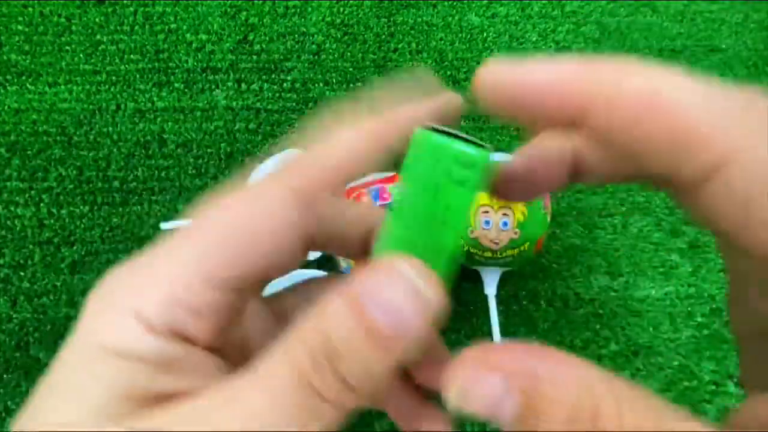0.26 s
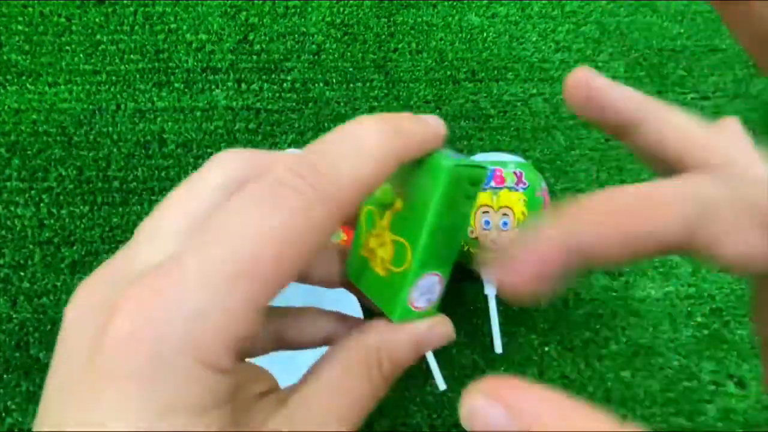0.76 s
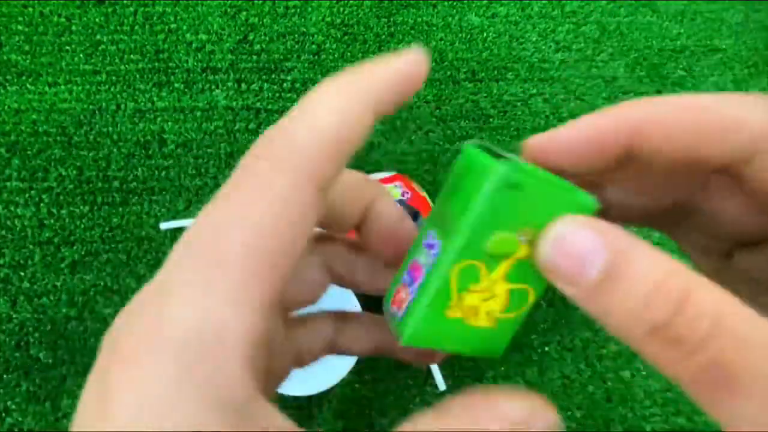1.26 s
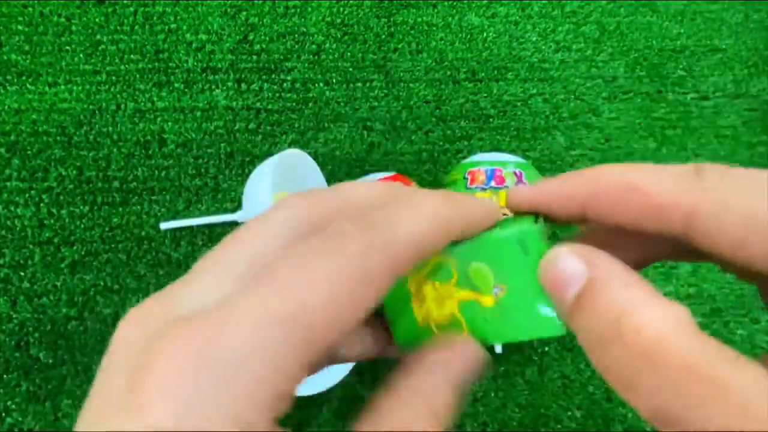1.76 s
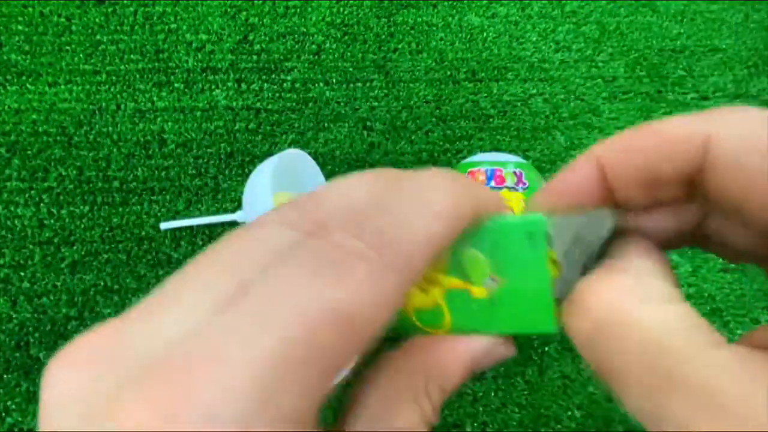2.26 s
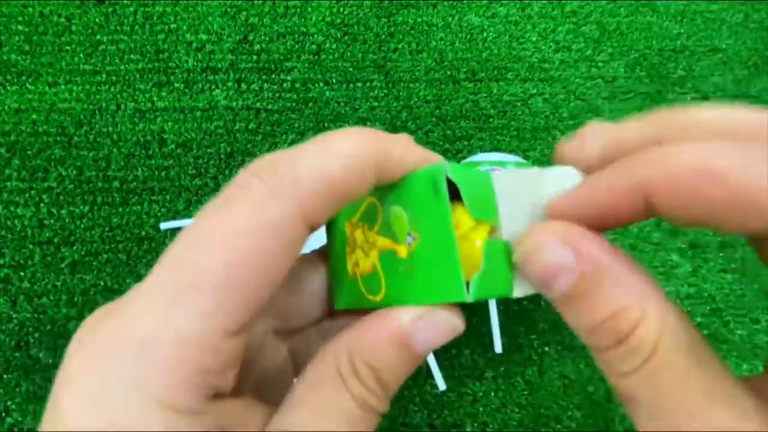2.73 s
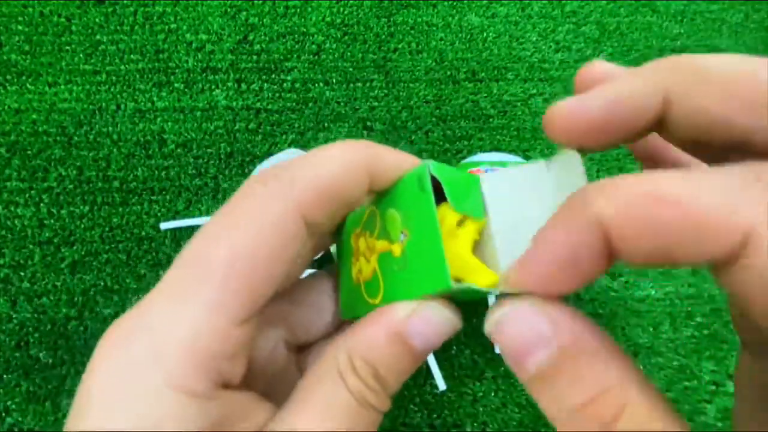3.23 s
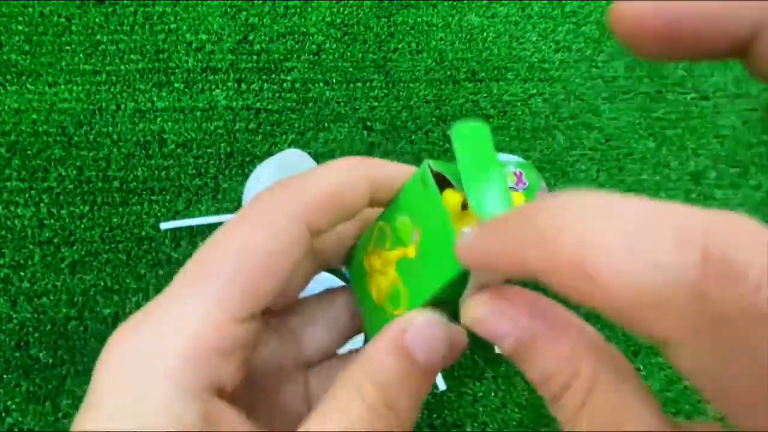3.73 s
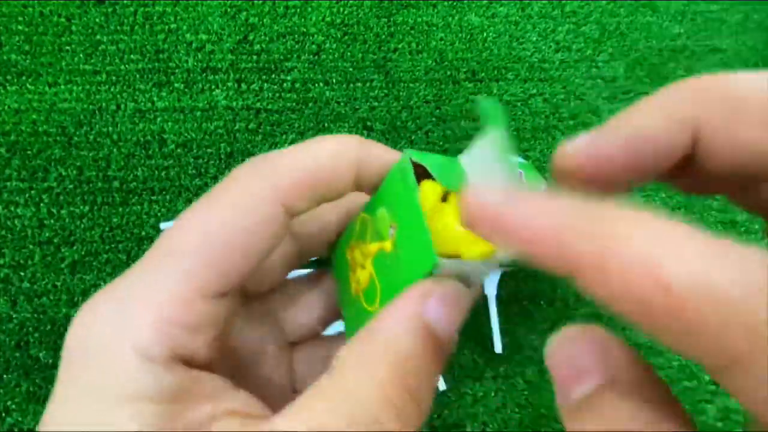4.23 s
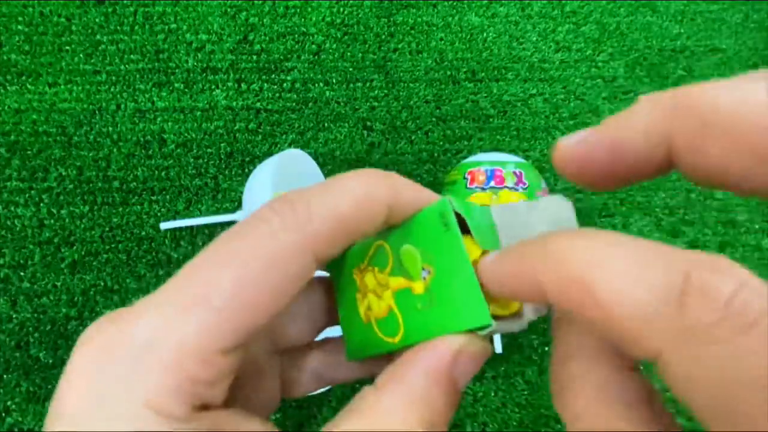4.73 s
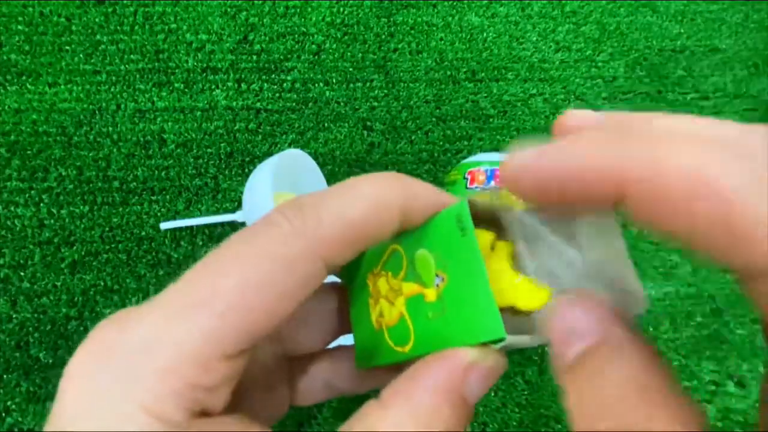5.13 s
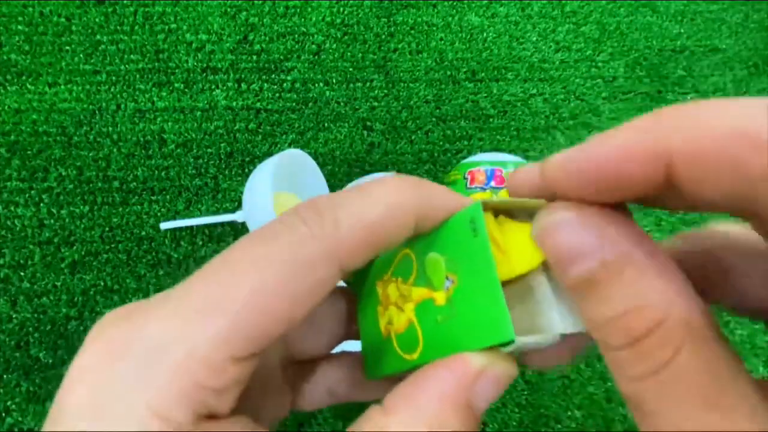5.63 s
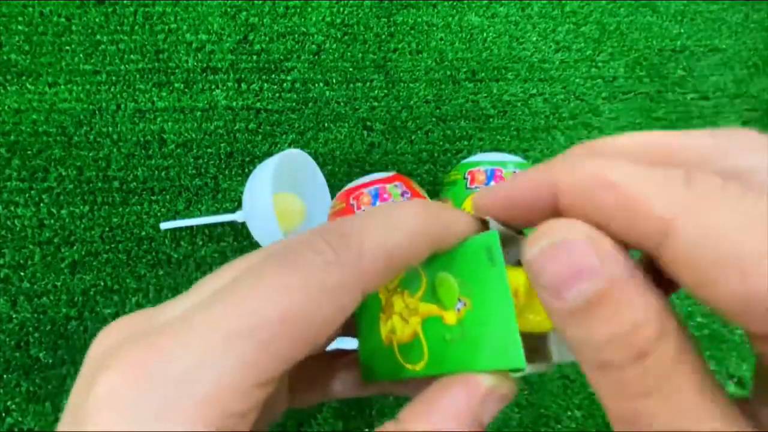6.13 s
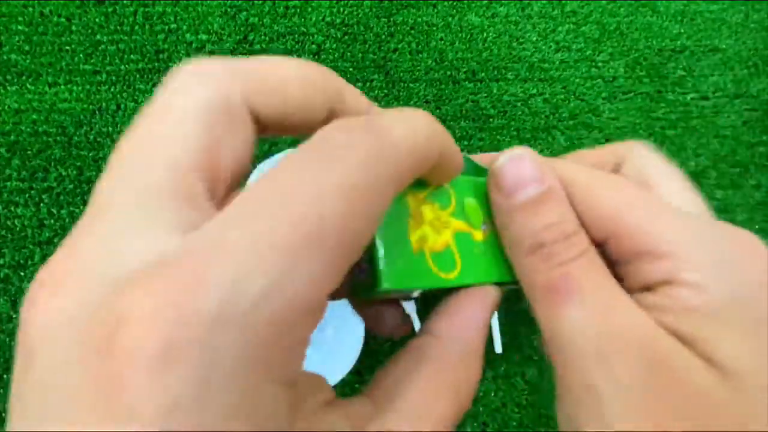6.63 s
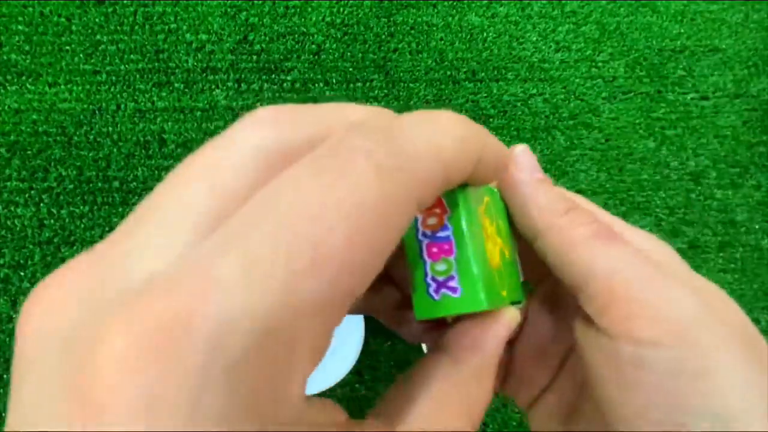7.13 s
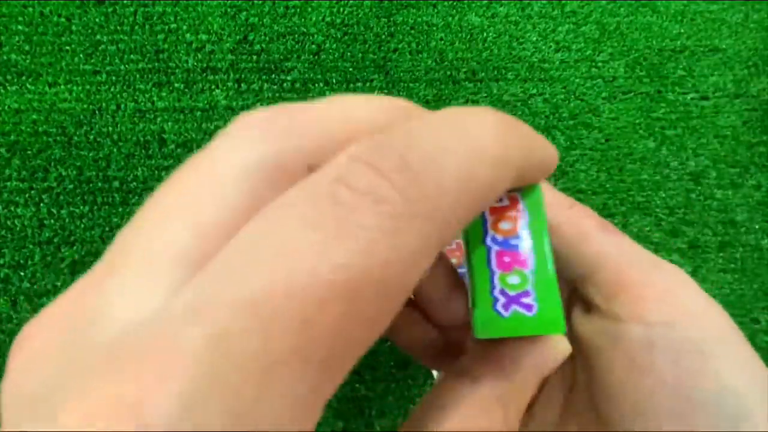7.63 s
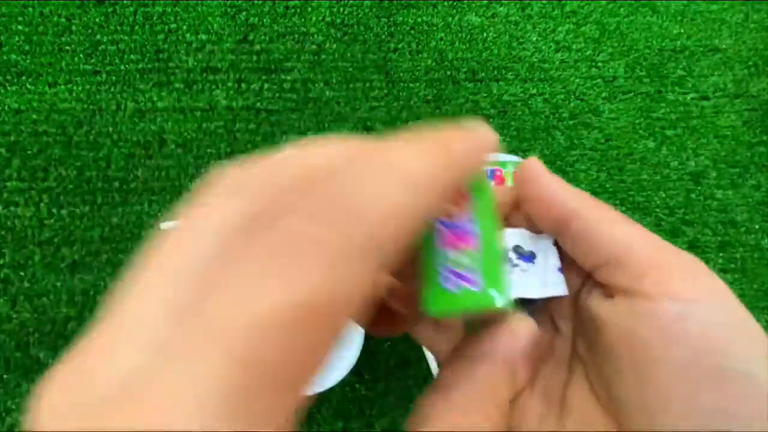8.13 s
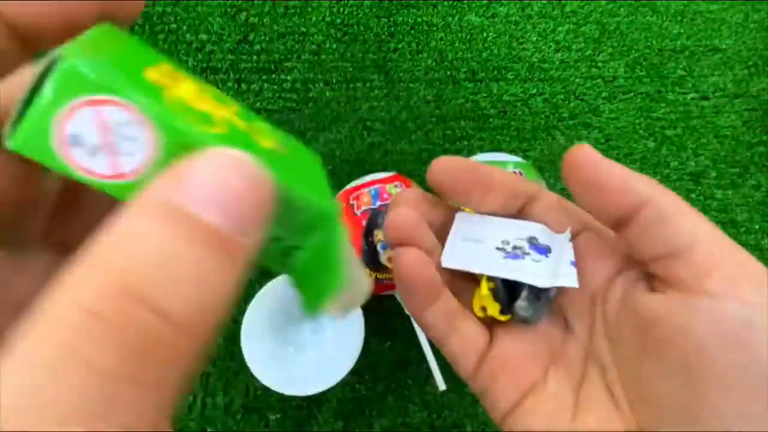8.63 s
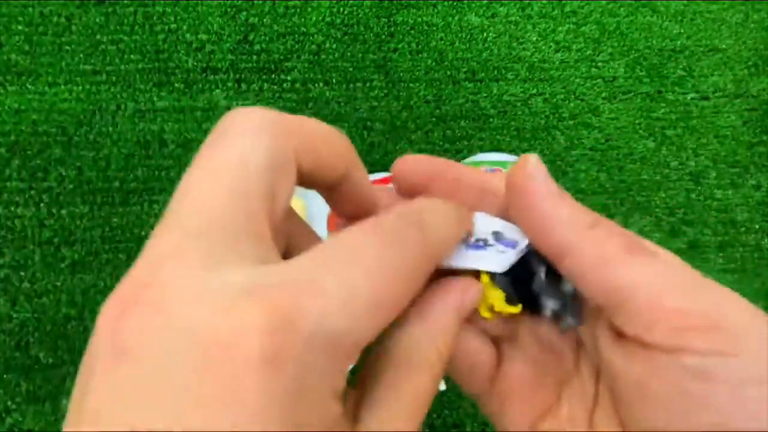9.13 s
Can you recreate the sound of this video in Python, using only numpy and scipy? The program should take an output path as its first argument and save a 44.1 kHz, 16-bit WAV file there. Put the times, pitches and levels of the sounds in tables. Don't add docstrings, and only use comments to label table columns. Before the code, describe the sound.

Very close to a stereo microphone, fingernails knock a small hollow card box in a few loud, separate taps. A crisp snap opens a flap, followed by irregular papery scrapes and faint creaks as the card is bent. Later, small plastic parts slide and rattle lightly out. Soft low hand bumps and a faint hush sit underneath in a small, soft-sounding space.

```python
import sys
import numpy as np
from scipy import signal
from scipy.fft import rfft, irfft, next_fast_len
from scipy.io import wavfile
from scipy.ndimage import map_coordinates

SR = 44100
rng = np.random.default_rng(int(sys.argv[2]) if len(sys.argv) > 2 else 0)


def magnitude_from_level(level_db):
    exponent = np.asarray(level_db, float) / 20
    return 10 ** exponent


def put_to_file(sound):
    columns = np.atleast_2d(sound).T
    safe = np.clip(columns, -1, 1)
    whole_steps = np.round(safe * 32767)
    wavfile.write(sys.argv[1], SR, whole_steps.astype(np.int16))


N = 413216

# (centre [Hz], width [Hz], level [dB])
BODY_MODES = [(460, 350, -13), (814, 260, -7.5), (1290, 288, 0)]
# (centre [Hz], width [Hz], level [dB])
WALL_MODES = [(1896, 500, 0), (2400, 570, 2), (3250, 1000, -5), (4300, 1300, -6.5), (5042, 980, -4),
              (6280, 930, -7.5)]
# (centre [Hz], width [Hz], level [dB])
EDGE_MODES = [(7970, 1200, -1), (9670, 650, 1.5), (10260, 1600, -3), (13300, 1800, -6), (15600, 2100, -12)]


def unit(x):
    return x / np.sqrt(np.mean(x ** 2, axis=-1, keepdims=True) + 1e-30)


def along(points, hz):
    point_hz, value = np.transpose(points)
    return np.interp(np.log(hz + 1), np.log(point_hz + 1), value)


def curves(rows):
    time_s, *columns = np.transpose(rows)
    return [np.interp(np.arange(N) / SR, time_s, column) for column in columns]


def wobble(rate_hz):
    knots = rng.standard_normal(int(N * rate_hz / SR) + 4)
    return map_coordinates(knots, [np.arange(N) * rate_hz / SR])


def filtered(x, response):
    size = next_fast_len(x.shape[-1] + 2048)
    spectrum = rfft(x, size) * response(np.fft.rfftfreq(size, 1 / SR))
    return irfft(spectrum, size)[..., :x.shape[-1]]


def resonance(hz, centre_hz, width_hz):
    damping = 1j * hz * width_hz
    return damping / (centre_hz * centre_hz - hz * hz + damping)


def ringing(modes, scatter_db=0, count=1):
    luck_db = scatter_db * rng.standard_normal((count, len(modes), 1))

    def response(hz):
        return sum((-1) ** k * magnitude_from_level(level_db + luck_db[:, k]) * resonance(hz, centre_hz, width_hz)
                   for k, (centre_hz, width_hz, level_db) in enumerate(modes))
    return response


def air():
    # (time [s], rumble level [dB])
    hand_bumps = [(0.0, -103), (0.1, -53), (0.18, -74), (0.7, -78), (0.78, -52.5), (0.91, -82), (1.02, -62),
                  (1.09, -71.5), (2.09, -77.5), (2.24, -75.5), (2.53, -84.5), (3.89, -72.5), (4.02, -90),
                  (4.41, -69), (4.46, -81.5), (7.93, -80), (8.43, -63.5), (8.51, -76), (8.82, -74.5),
                  (8.98, -58), (9.06, -78), (9.37, -69.5)]
    # (frequency [Hz], density [dB per Hz])
    rumble_spectrum = [(20, -16.5), (50, -5), (90, -2.5), (200, -14), (400, -23), (900, -36), (2000, -120)]
    # (frequency [Hz], density [dB per Hz])
    hush_spectrum = [(60, -120), (150, 1), (500, 5), (1500, -5), (4000, -3.5), (10000, -15.5), (16000, -17)]
    noise = rng.standard_normal((2, N))
    low = unit(filtered(noise, lambda hz: magnitude_from_level(along(rumble_spectrum, hz))))
    bump_gain = magnitude_from_level(curves(hand_bumps)[0] + 2.5 * wobble(25))
    shared = low[0] * magnitude_from_level([[-.8], [.8]])
    opposed = .3 * low[1] * [[1], [-1]]
    noise = rng.standard_normal((2, N))
    hush = unit(filtered(noise, lambda hz: magnitude_from_level(along(hush_spectrum, hz))))
    return bump_gain * (shared + opposed) + magnitude_from_level(-82.5) * hush


def room(x):
    # (frequency [Hz], t60 [s])
    decay_times = [(200, 0.48), (1000, 0.21), (4000, 0.21), (10000, 0.17), (16000, 0.04)]
    hz, t, z = signal.stft(rng.standard_normal((2, SR // 2)), SR, nperseg=256)
    decay = magnitude_from_level(-60 * t / along(decay_times, hz)[:, None])
    tail = signal.istft(z * decay, SR, nperseg=256)[1]
    tail = np.pad(tail / np.linalg.norm(tail[0]), ((0, 0), (round(0.005 * SR), 0)))
    tail = filtered(tail, lambda hz: 1 / (1 + 1j * hz / 7000))
    return [signal.fftconvolve(x, one)[:N] for one in tail]


def slide():
    # (time [s], scrape level [dB], hollow body [dB], crisp edge [dB])
    scrapes = [(0.0, -55.5, -6, -20), (0.08, -55.5, -4.5, -12), (0.125, -66, 4, -12),
               (0.16, -76.5, 15, -12), (0.2, -85.5, 11.5, -8.5), (0.284, -71.5, 7.5, 3.5),
               (0.354, -55, -1, -6.5), (0.429, -69, -2, -1.5), (0.753, -75, -2.5, -17.5),
               (0.783, -49, -4, -13), (0.973, -75.5, 0.5, -10.5), (0.998, -50.5, -2.5, -14),
               (1.212, -74, -1.5, -0.5), (1.237, -48, -4.5, -4.5), (1.342, -72.5, -0.5, -7),
               (1.467, -79, -6.5, -11.5), (1.492, -54.5, 10, -9.5), (1.541, -76.5, 1, -8.5),
               (1.761, -59, -0.5, -8), (1.906, -57.5, -5, -10.5), (1.98, -45, -5, -8), (2.04, -64, -4, -10),
               (2.185, -86, 2, 3.5), (2.21, -34.5, 4.5, 6.5), (2.27, -63.5, -4.5, -4.5),
               (2.479, -62.5, 1.5, -7.5), (2.519, -76.5, -1.5, -10), (2.574, -49.5, -3, -4.5),
               (2.624, -48.5, -3, -1.5), (2.679, -77, 0, -12), (2.769, -55.5, -2.5, -5.5),
               (2.794, -67, -3, -4), (2.829, -54.5, 2, 3.5), (2.873, -76.5, -6, -1),
               (2.928, -57.5, -3.5, -2.5), (3.073, -74.5, -6, -3.5), (3.188, -56, -7.5, -6.5),
               (3.547, -69, -7, -4.5), (3.577, -41.5, -1, -5), (3.662, -66, -17, -3.5),
               (3.702, -54.5, -9.5, -7.5), (3.766, -64, -14.5, -10), (3.801, -43.5, -8.5, -7),
               (3.846, -39, -6.5, -7.5), (3.941, -72, -7, -6.5), (4.176, -76.5, -10.5, -10.5),
               (4.245, -53, -5, -5.5), (4.295, -67, -8, -8.5), (4.33, -43, -4.5, -5.5), (4.375, -73, 0, -6),
               (4.51, -55.5, -10.5, -4), (4.575, -67.5, -8, -4), (4.629, -64.5, -1, -10.5),
               (4.919, -71, -4, -7.5), (4.949, -42.5, -13, -5), (5.004, -61, -9.5, -9),
               (5.223, -47, -7.5, -6.5), (5.318, -59, -5.5, -12), (5.378, -44.5, -6.5, -11),
               (5.507, -63, -1.5, -13.5), (5.587, -39, -4, -15), (5.667, -71.5, 1.5, -6),
               (5.832, -64.5, -0.5, -3.5), (5.897, -74, -14, -5.5), (5.941, -54.5, -1.5, -9),
               (6.046, -70, 4, -17), (6.071, -52.5, 6, -14.5), (6.096, -47, 4, -14.5),
               (6.136, -46.5, 2.5, -8.5), (6.186, -70.5, -13, -4), (6.316, -73, -6, -3.5),
               (6.351, -56, -1.5, -2.5), (6.39, -55, -5, -3), (6.42, -58.5, -1, -5.5),
               (6.929, -66, -3, -8.5), (6.964, -48, -6, -17), (7.024, -40, -2.5, -14),
               (7.099, -61, -4, -20.5), (7.134, -45.5, -2.5, -12.5), (7.249, -59.5, -0.5, -11),
               (7.323, -45, -1.5, -11.5), (7.363, -49.5, -3.5, -11.5), (7.393, -64, -4.5, -14.5),
               (7.428, -46, -3.5, -12), (7.558, -38.5, -19, -3), (7.618, -65.5, -11.5, -5),
               (7.643, -48, -10, -7), (7.732, -50.5, -10, -10), (8.122, -80.5, -10, 1),
               (8.161, -49.5, -7.5, -7), (8.231, -81, -3, -8), (8.326, -70.5, -8.5, -3),
               (8.351, -40, -7, -4), (8.376, -38, -7.5, -5), (8.496, -47.5, -16.5, -5),
               (8.521, -76, -30, -3), (8.81, -60.5, -13, -10.5), (8.88, -61, -9, -6),
               (8.955, -46.5, -12, -11), (9.024, -58, -21, -7.5), (9.049, -73, -15, -7.5),
               (9.159, -66, -10, -3.5), (9.224, -48, -15, -7.5), (9.369, -65, -7.5, 2)]
    scrape_db, body_db, edge_db = curves(scrapes)
    clumps = magnitude_from_level(5.1 * wobble(35) + 3.2 * wobble(170))
    slips = (rng.random(N) < 700 / SR) * magnitude_from_level(4 * rng.exponential(size=N))
    out = []
    for side in range(2):
        ticks = unit(slips) * rng.choice([-1, 1], (3, N))
        rub = unit(clumps * (0.39 * ticks + .8 * rng.standard_normal((3, N))))
        rub *= magnitude_from_level(1.9 * np.array([wobble(25) for part in rub]))
        body, wall, edge = [unit(filtered(part, ringing(modes))[0])
                            for part, modes in zip(rub, (BODY_MODES, WALL_MODES, EDGE_MODES))]
        out.append(magnitude_from_level(scrape_db) * (magnitude_from_level(body_db) * body + wall + magnitude_from_level(edge_db) * edge))
    return out


def taps():
    # (time [s], blow level [dB], hollow body [dB], crisp edge [dB],
    # touched wall [Hz], contact [ms])
    contacts = [(0.0899, -19, -5, -18.5, 5070, 1.8), (0.0984, -6.5, -4.5, -13.5, 5270, 2.4),
                (0.3497, -33, -0.5, -17.5, 2740, 5.4), (0.3542, -32.5, 2, -19, 2750, 2.4),
                (0.4683, -45, -7, -15.5, 2270, 3.6), (0.6452, -47.5, -6, -8.5, 1850, 2),
                (0.7676, -24.5, -10.5, -11.5, 2480, 1.8), (0.776, -4, -4, -4.5, 2370, 2.2),
                (0.9825, -24, -10, -12.5, 2320, 2.8), (0.9914, -9.5, -3, -8.5, 2480, 2.3),
                (1.2345, -32.5, -3.5, 1, 2580, 2.5), (1.2985, -43.5, 0, -17, 2200, 4.6),
                (1.3077, -45, -6.5, -20.5, 2390, 3), (1.4755, -44, 0, -8.5, 6100, 2.1),
                (1.6008, -53.5, 14, -14, 2230, 3.6), (1.991, -10.5, -7.5, -6, 2090, 3),
                (2.1594, -67, -5, 19, 3650, 1.6), (2.1878, -51, 1.5, -2, 6430, 1.9),
                (2.2183, -11.5, -4.5, 8, 3790, 6.7), (2.317, -17.5, -1, -9.5, 2300, 2.4),
                (2.4114, -43.5, -1, -13.5, 1880, 2.5), (2.5341, -38, -15.5, -5.5, 6500, 1.6),
                (2.5661, -31, -2, -9.5, 1915, 5.1), (2.7536, -46, 4.5, -13.5, 1703, 3.4),
                (2.9263, -38.5, 2, -11.5, 1913, 4.3), (3.244, -43.5, 0, -15, 1850, 3.3),
                (3.4175, -45.5, -17, 5.5, 4880, 5.1), (3.6992, -32, -17, -7, 2680, 2.4),
                (3.7896, -29, -7.5, -14, 2430, 4.2), (3.8432, -23, -14, -3, 4820, 3),
                (4.1137, -50, -2, -12, 1820, 5.7), (4.397, -47, -12, -7, 1920, 6.6),
                (4.4249, -48, -2, 2, 1710, 3.6), (4.5076, -37.5, -34, -12, 1780, 4.7),
                (4.6854, -42, -8, -14, 4330, 4.6), (4.8351, -50, -3.5, -4, 1670, 3.0),
                (4.9457, -33, 0, -7.5, 1820, 4.2), (5.226, -27, -13.5, -9, 3530, 2.1),
                (5.2664, -32, -11, -3.5, 1880, 2.5), (5.3178, -42.5, -7.5, -2.5, 3470, 3.7),
                (5.3263, -35.5, -15, -7.5, 5070, 1.5), (5.3717, -36, -4, -5.5, 1690, 5.1),
                (5.3976, -46, 0.5, -15, 1830, 4.2), (5.45, -41.5, -6.5, -3.5, 1840, 3.6),
                (5.4733, -41.5, 3, -18, 1830, 4.9), (5.5583, -35.5, -3.5, -20.5, 1810, 3.3),
                (5.575, -30.5, 1.5, -16.5, 1685, 7.4), (5.6905, -50, -4.5, -6.5, 1790, 2.2),
                (5.7352, -41.5, -6.5, -6, 1660, 5.4), (5.8075, -45, -10, -4.5, 5600, 3.7),
                (5.8295, -49.5, -1.5, -4, 1850, 2.5), (5.9114, -33.5, -3.5, -7, 1770, 1.83),
                (6.2265, -52, 7.5, -6, 1980, 2.9), (6.434, -34, -5, -7, 1660, 4.8),
                (6.6131, -37.5, -6.5, -16, 2256, 3.5), (6.8142, -51, -3, -17.5, 2400, 2.7),
                (7.0398, -32, -4, -4.5, 1740, 3.6), (7.0622, -36, -10.5, -20, 2250, 2),
                (7.1308, -32, -4, -16.5, 2560, 5.7), (7.201, -44, -11.5, -24, 2510, 3.8),
                (7.2108, -40, -1, -19, 1760, 3.2), (7.5014, -28.5, -6.5, -16, 1960, 2.6),
                (7.5319, -30.5, -17.5, -8, 2560, 2.4), (7.5379, -30.5, -17, -6, 2890, 3.0),
                (7.5639, -31, -17, -1, 2620, 2), (7.6153, -45.5, -10.5, 7.5, 4940, 1.8),
                (7.6412, -38, -16, 1, 5300, 2.7), (8.1265, -37.5, -10, -10.5, 2350, 2.3),
                (8.1632, -27, -15.5, -18.5, 4060, 2.14), (8.3666, -23.5, -5.5, -9, 1600, 3.3),
                (8.382, -25.5, -7, -6.5, 3870, 2.2), (8.4517, -34, -16.5, 2, 4800, 3.3),
                (8.557, -42, -19, 0.5, 3930, 3.3), (8.5777, -47.5, -28, -6, 4050, 2.7),
                (8.7757, -41.5, -16, -14, 1844, 1.9), (8.883, -35, -7.5, -10.5, 2450, 6.5),
                (9.1622, -47.5, -17, 2.5, 2750, 2.8), (9.2185, -36.5, -23.5, -10.5, 2990, 2.1),
                (9.2908, -36.5, -8, 5, 2030, 1.5), (9.3641, -45, -3, 8, 4920, 3.3)]
    time_s, blow_db, body_db, edge_db, wall_hz, contact_ms = np.transpose(contacts)[:, :, None]
    count = len(time_s)
    t = np.arange(1024) / SR
    u = t / (np.clip(contact_ms, .3, 12) / 1000)
    chatter = rng.standard_normal((3, count, len(t))) * u ** 0.61 * np.exp(-u ** 1.8)
    walls = ringing(WALL_MODES, scatter_db=5, count=count)

    def touched(hz):
        return walls(hz) + magnitude_from_level(5.5) * resonance(hz, wall_hz, 450)

    responses = (ringing(BODY_MODES, scatter_db=5, count=count), touched,
                 ringing(EDGE_MODES, scatter_db=4.5, count=count))
    body, wall, edge = [unit(filtered(part, r)) for part, r in zip(chatter, responses)]
    tap = magnitude_from_level(blow_db + 1.0) * (magnitude_from_level(body_db) * body + wall + magnitude_from_level(edge_db) * edge)
    tap *= np.sqrt(SR / 1000 / len(t))
    where = np.round(time_s * SR).astype(int) + np.arange(len(t))
    return np.bincount(where.ravel(), tap.ravel(), N + len(t))[:N]


def ports(near, other):
    # (frequency [Hz], lead [rad])
    phase_lead = [(100, .1), (1380, 0), (2400, .8), (3450, .7), (4500, 1), (5500, 1.3), (6550, 2.5),
                  (7600, 3.3), (9650, 5.5), (10700, 6.5), (12750, 8.9), (13800, 9.5), (16000, 11.8)]
    # (frequency [Hz], difference [dB])
    level_lean = [(100, -1), (400, -3), (1300, 0), (2500, -2), (5000, -2), (8000, -1), (15000, -0.5)]
    # (frequency [Hz], correlation [0..1])
    likeness = [(100, .9), (350, 0.28), (620, 0.087), (1300, .9), (3000, 0.3), (8000, 0.93), (15000, 0.37)]
    side = np.array([[1], [-1]])

    def mix_angle(hz):
        return np.arccos(np.clip(along(likeness, hz), 0, 1)) / 2

    def shade(hz):
        return magnitude_from_level(side * along(level_lean, hz) / 2) * np.exp(.5j * side * along(phase_lead, hz))

    same = filtered(near, lambda hz: shade(hz) * np.cos(mix_angle(hz)))
    unlike = filtered(other, lambda hz: side * shade(hz) * np.sin(mix_angle(hz)))
    return same + unlike


def scene():
    tap = taps()
    rub, rub_other = slide()
    wet, wet_other = room(tap + rub)
    scattered = filtered(tap, ringing(BODY_MODES + WALL_MODES + EDGE_MODES, scatter_db=10.5))[0]
    near = tap + rub + magnitude_from_level(-15.5) * wet
    other = magnitude_from_level(-6.5) * scattered + rub_other + magnitude_from_level(-13) * wet_other
    return ports(near, other) + air()


def band_limit(x):
    return signal.sosfilt(signal.butter(12, 17000, fs=SR, output="sos"), x)


def record(dry):
    limited = filtered(dry, lambda hz: hz < 16300)
    return band_limit(limited)


dry = scene()
out = record(dry)
put_to_file(out)
```